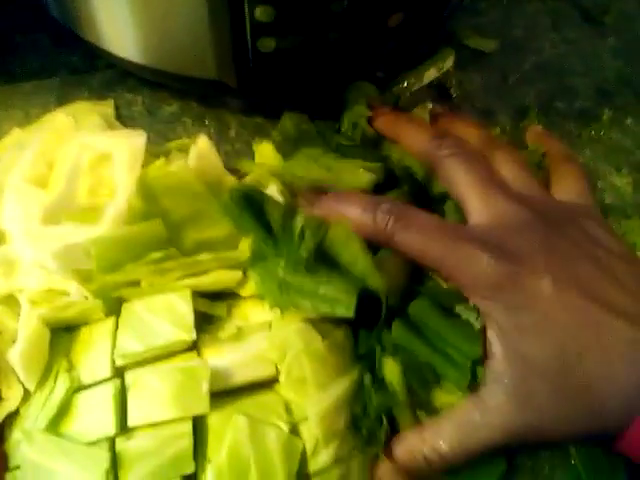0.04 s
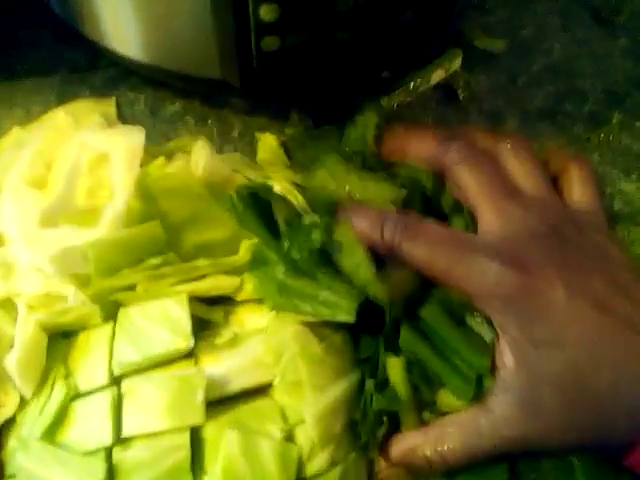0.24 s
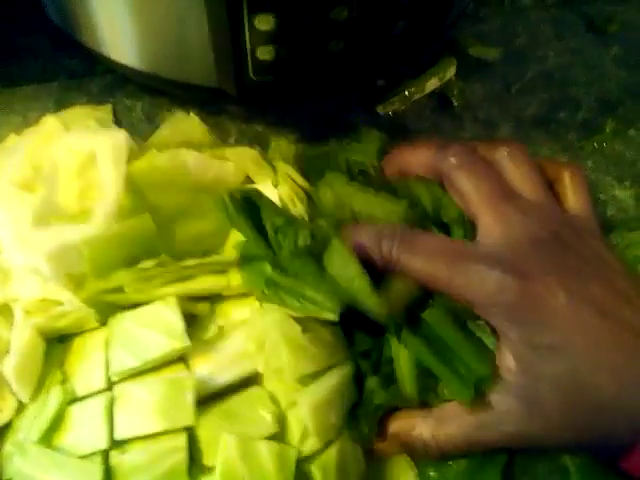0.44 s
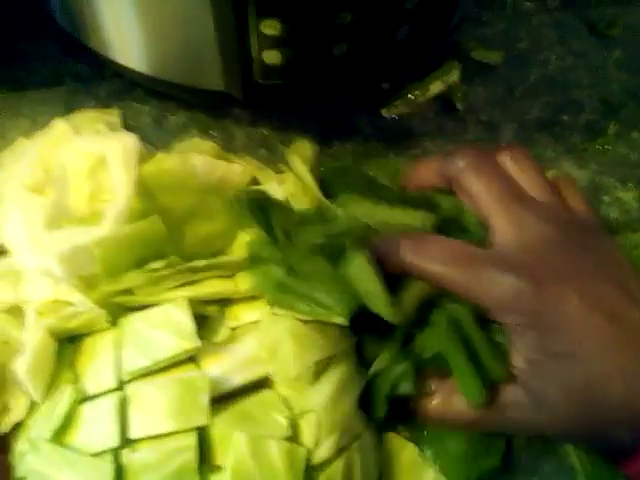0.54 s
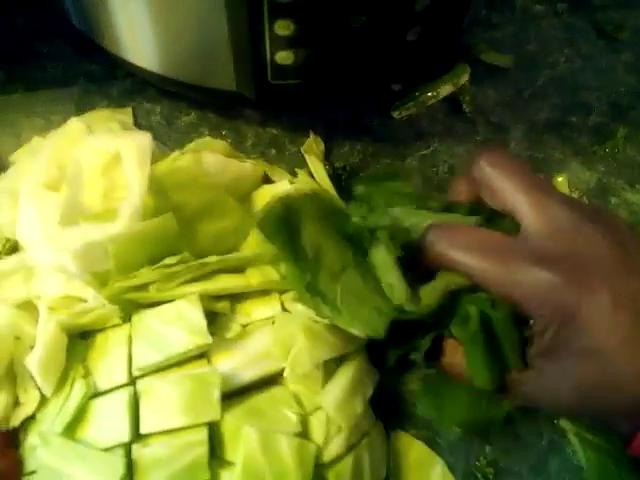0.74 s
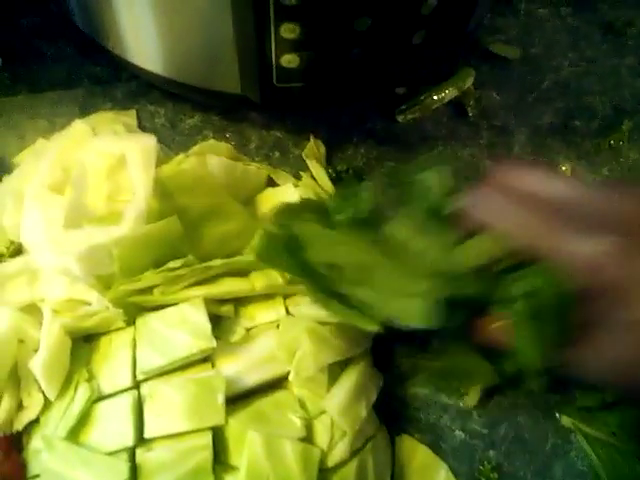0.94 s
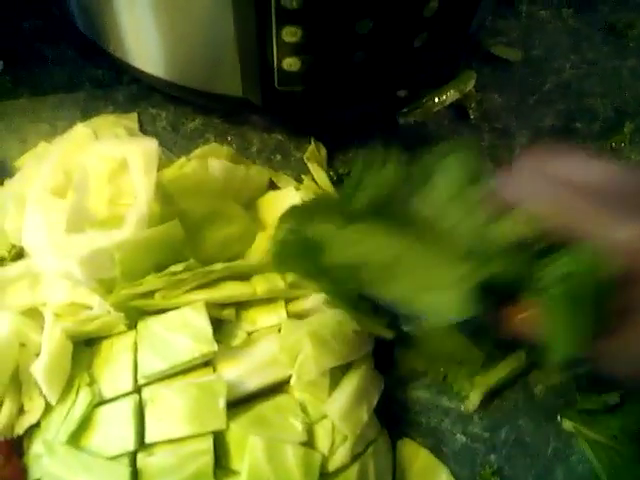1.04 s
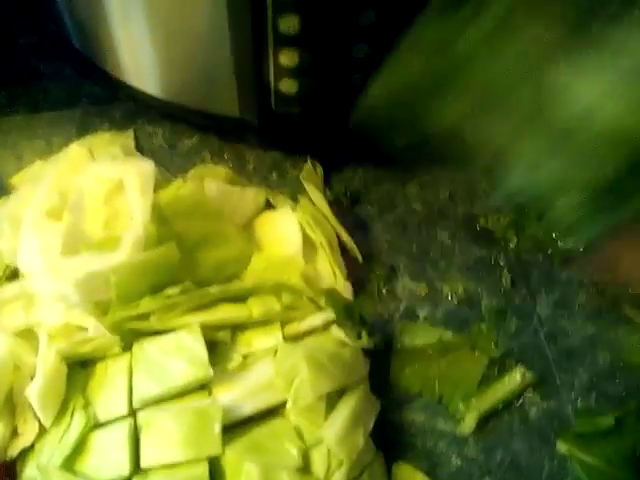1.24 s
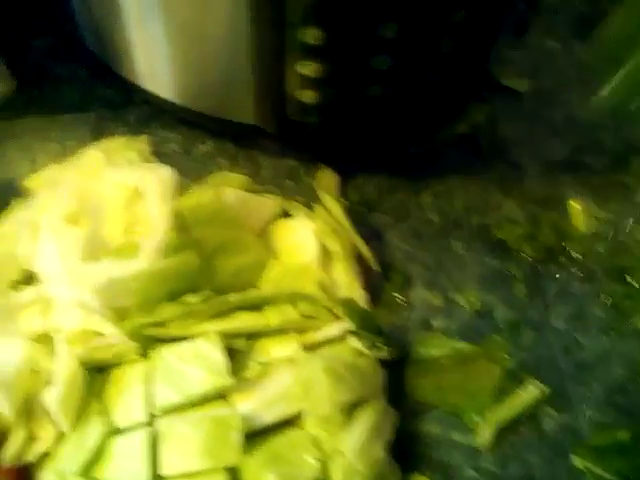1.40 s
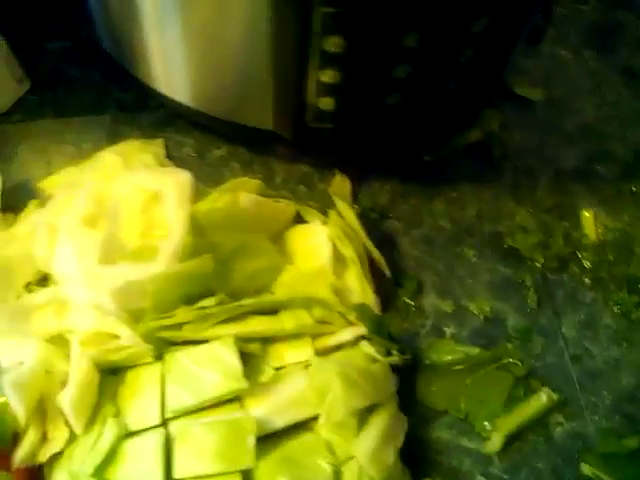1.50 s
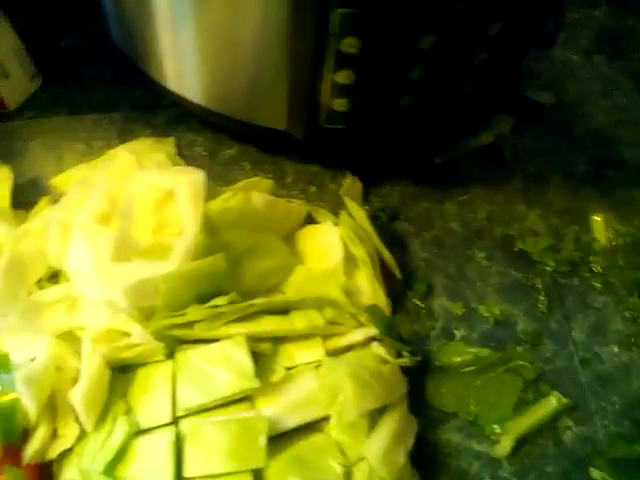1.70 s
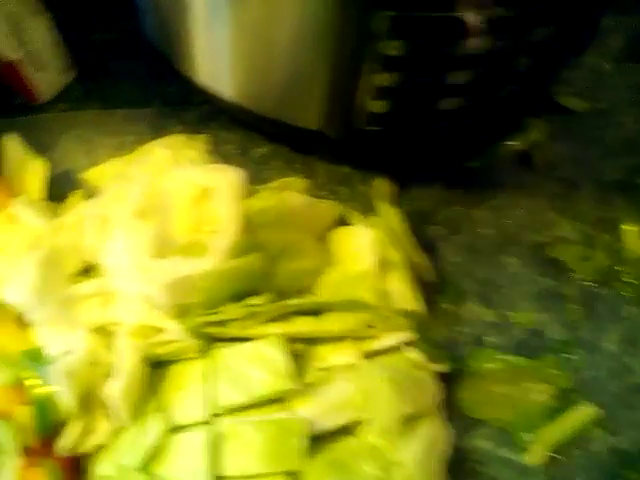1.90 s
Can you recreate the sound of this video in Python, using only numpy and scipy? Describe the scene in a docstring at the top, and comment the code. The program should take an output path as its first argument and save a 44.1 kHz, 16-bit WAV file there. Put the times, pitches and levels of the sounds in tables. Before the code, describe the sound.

Chopped leafy greens crinkle and snap in a closing hand, scrape with small squeaks along a stone counter, then lift away; a quiet appliance hum remains, close to a cheap, gritty camera microphone in a kitchen.

```python
"""Close to a small camera in a kitchen: an appliance hums throughout, over dull room air.
A hand closes on chopped leafy greens on a stone counter: dense creases crinkle and bursts of cracks snap.
Fingertips thump softly, and stick-slip pulses ring a squeak and a low body as the bunch is dragged along.
The bunch is lifted away, a few last snaps fall, and the hum is left.
The camera's coarse amplitude steps, then its low sample rate, turn the quiet hum gritty."""
import sys
import numpy as np
from scipy import signal
from scipy.fft import rfft, irfft, next_fast_len
from scipy.io import wavfile
from scipy.ndimage import uniform_filter1d

SR = 44100
rng = np.random.default_rng(int(sys.argv[2]) if len(sys.argv) > 2 else 0)


def waveform_to_disk(signal):
    """Save audio, clipped to [-1, 1], as 16-bit WAV at the path in sys.argv[1]."""
    frames = np.transpose(np.atleast_2d(signal))
    scaled = np.clip(frames, -1, 1) * 32767
    samples = np.round(scaled).astype(np.int16)
    wavfile.write(sys.argv[1], SR, samples)


def invert_db(x):
    """Field ratio 10**(x/20) for x, a level in decibels (scalar or array-like)."""
    u = np.asarray(x, float) / 20
    return 10 ** u


N = 85995

# How hard the leaves rub in the closing hand: (time [s], level [dB])
SQUEEZE_EFFORT = [(0.0, -55.5), (0.168, -62.5), (0.196, -47.5), (0.258, -52.5), (0.318, -43.5),
                  (0.354, -58.5), (0.406, -39), (0.428, -52), (0.476, -52.5), (0.488, -36), (0.52, -50.5),
                  (0.552, -37), (0.56, -46), (0.588, -48), (0.642, -46.5), (0.662, -35.5), (0.714, -55),
                  (0.73, -32.5), (0.762, -42.5), (0.872, -39.5), (0.908, -43.5), (0.92, -37.5),
                  (0.932, -35.5), (0.948, -39), (0.956, -34.5), (0.984, -39), (1.032, -39), (1.05, -34.5),
                  (1.062, -36.5), (1.078, -36), (1.09, -39.5), (1.13, -34.5), (1.182, -46.5), (1.19, -36),
                  (1.222, -53.5), (1.272, -58), (1.288, -52), (1.328, -83.5), (1.356, -62), (1.45, -72.5)]


def unit(x):
    """Scales a signal to rms 1."""
    return x / np.sqrt(np.mean(x ** 2) + 1e-20)


def along(points, hz):
    """Reads (frequency, value) points on a logarithmic frequency axis."""
    f, v = np.transpose(points)
    return np.interp(np.log(hz + 1), np.log(f + 1), v)


def level(rows):
    """Gain per sample from (time [s], level [dB]) rows, at -120 dB outside them."""
    s, db = np.transpose(rows)
    return invert_db(np.interp(np.arange(N) / SR, s, db, left=-120, right=-120))


def filtered(x, response):
    """Multiplies the spectrum of x by a response of frequency."""
    m = next_fast_len(N + SR // 2)
    return irfft(rfft(x, m) * response(np.fft.rfftfreq(m, 1 / SR)), m)[:N]


def resonant(x, peaks):
    """Passes x through parallel resonances (frequency [Hz], width [Hz], level [dB]) of alternating sign."""
    def response(f):
        total = 0
        for k, (center, width, db) in enumerate(peaks):
            damping = 1j * f * width
            total = total + (-1) ** k * invert_db(db) * damping / (center * center - f * f + damping)
        return total
    return filtered(x, response)


def grains(start_s, hz, cycles, gain, size=256):
    """Adds up short sines that rise in about half a cycle and decay over the given cycles."""
    t = np.arange(size) / SR
    turns = hz[:, None] * t
    envelope = np.exp(-turns / cycles) * (1 - np.exp(-turns / .5))
    wave = gain[:, None] * np.sin(2 * np.pi * turns) * envelope
    at = (start_s * SR).astype(int)[:, None] + np.arange(size)
    return np.bincount(at.ravel(), wave.ravel(), N + SR)[:N]


def crinkle():
    """Dense tiny creases over a rubbing hiss, in clumps that start sharply and die away."""
    # Colour of the rubbing hiss: (frequency [Hz], relative spectral level [dB])
    leaf_color = [(180, -23), (300, 1.5), (387, -22.5), (449, -6), (636, -15), (1000, -3), (1440, -12),
                  (4630, -6), (7400, -5.5), (9620, -43.5), (16300, -120)]
    creases_per_s, center_hz, spread_db = 3000, 3800, 3
    clumps_per_s, clump_decay_s = 170, .004

    u = rng.random((8000, 2))
    g = rng.standard_normal(len(u))
    start_s = np.cumsum(-np.log(1 - u[:, 0])) / creases_per_s
    keep = start_s < N / SR
    hz = np.clip(center_hz * np.exp(.55 * g), 400, 7500)[keep]
    gain = np.sqrt(hz) * invert_db(-spread_db * np.log(1 - .98 * u[keep, 1]))
    creases = grains(start_s[keep], hz, 2.2, gain, size=128)
    hiss = filtered(rng.standard_normal(N), lambda f: invert_db(along(leaf_color, f)))

    kicks = (rng.random(N) < clumps_per_s / SR) * rng.random(N)
    decay = np.exp(-1 / (clump_decay_s * SR))
    clumps = .5 + unit(signal.lfilter([1], [1, -decay], kicks))
    rubbing = unit(creases) + invert_db(-1.5) * unit(hiss)
    return level(SQUEEZE_EFFORT) * unit(rubbing * clumps ** .5)


def snaps():
    """Each snap of leaf or stalk is a click and dying cracks around one pitch, on a puff of that colour."""
    # Leaves and stalks snapping: (time [s], level before the part levels below [dB], pitch [Hz],
    # t60 of the cracks [s], pitch spread [log ratio])
    snap_events = [(0.183, -37.5, 5360, 0.03, 0.23), (0.199, -40, 4400, 0.03, 0.12),
                   (0.2857, -33.5, 5630, 0.03, 0.14), (0.3034, -41.5, 5340, 0.03, 0.2),
                   (0.3184, -39, 4500, 0.03, 0.2), (0.3681, -33, 3880, 0.03, 0.3),
                   (0.394, -41, 2430, 0.03, 0.17), (0.4044, -37.5, 3210, 0.03, 0.23),
                   (0.4851, -28, 3010, 0.03, 0.17), (0.5074, -28, 5600, 0.03, 0.12),
                   (0.5271, -34, 1566, 0.03, 0.18), (0.5463, -12, 6730, 0.03, 0.095),
                   (0.552, -32.5, 6800, 0.03, 0.11), (0.5764, -37, 2890, 0.03, 0.31),
                   (0.6008, -31.5, 2340, 0.03, 0.31), (0.6509, -35, 5300, 0.03, 0.16),
                   (0.6616, -29, 5700, 0.03, 0.068), (0.7214, -26, 6500, 0.03, 0.075),
                   (0.7286, -18, 6230, 0.03, 0.078), (0.8139, -28.5, 6060, 0.03, 0.14),
                   (0.8334, -26.5, 4820, 0.03, 0.31), (0.863, -30, 1774, 0.03, 0.2),
                   (0.8824, -32.5, 2780, 0.03, 0.23), (0.9177, -34.5, 3090, 0.03, 0.29),
                   (0.9428, -18.5, 4540, 0.03, 0.26), (0.9714, -24.5, 3340, 0.03, 0.23),
                   (0.983, -18, 6140, 0.03, 0.23), (0.9909, -31, 6200, 0.03, 0.13),
                   (1.0031, -27, 2144, 0.03, 0.18), (1.0224, -32.5, 2120, 0.03, 0.31),
                   (1.043, -24, 4450, 0.03, 0.26), (1.0504, -28, 3240, 0.03, 0.15),
                   (1.0542, -26, 4400, 0.03, 0.24), (1.0733, -22.5, 5750, 0.03, 0.14),
                   (1.0795, -28.5, 5120, 0.03, 0.2), (1.122, -37, 2150, 0.03, 0.29),
                   (1.1455, -29, 2240, 0.03, 0.23), (1.165, -22, 5000, 0.03, 0.23),
                   (1.1901, -27, 3170, 0.03, 0.25), (1.2869, -34.5, 5500, 0.03, 0.3),
                   (1.3538, -41, 6200, 0.03, 0.14), (1.3684, -41.5, 3850, 0.03, 0.12),
                   (1.5369, -48, 4300, 0.03, 0.16), (1.5489, -43.5, 3280, 0.03, 0.2)]
    crack_db, puff_db, click_db = -8, -10, -6
    n_cracks, puff_rise_s, puff_lingers = 12, 0.00055, 1.4  # puff t60 over crack t60

    out, t = np.zeros(N + SR), np.arange(SR // 8) / SR
    f = np.fft.rfftfreq(len(t), 1 / SR) + 1
    for s, db, hz, t60, spread in snap_events:
        spread = np.clip(spread, .05, .8)
        u, g = rng.random(n_cracks), rng.standard_normal((2, n_cracks))
        # the first two cracks fall together, the rest crowd toward the start
        late_s = t60 / 3 * u ** 1.5 * (np.arange(n_cracks) > 1)
        crack_hz = np.clip(hz * np.exp(spread * g[0]), 700, 7600)
        crack_gain = invert_db(db + crack_db + 2.1 * g[1] - 60 * late_s / t60)
        out[:N] += grains(s + late_s, crack_hz, 4, crack_gain)

        color = 1 / (1 + (np.log(f / hz) / (2.4 * spread)) ** 4)
        puff = unit(irfft(rfft(rng.standard_normal(len(t))) * color, len(t)))
        fade = invert_db(db + puff_db - 60 * t / (t60 * puff_lingers))
        out[round(s * SR):][:len(t)] += fade * (1 - np.exp(-t / puff_rise_s)) * puff

        click_gain = np.array([invert_db(db + click_db)])
        out[:N] += grains(np.array([s]), np.array([3500.]), 0.28, click_gain, size=64)
    return out[:N]


def drag():
    """Stick-slip pulses of damp leaves on stone ring a gliding squeak, a low body and the bunch's hollow."""
    # Bunch sliding on the counter: (time [s], level before the part levels below [dB],
    # squeak pitch [Hz], body level before a 2 dB cut [dB])
    slide = [(0.45, -75, 980, -2), (0.466, -85, 1074, 19), (0.492, -63.5, 1054, 2.5),
             (0.586, -56.5, 954, 2.5), (0.648, -44, 1060, -3.5), (0.69, -46, 1054, 2),
             (0.704, -57, 1055, 11), (0.726, -44, 1060, -7.5), (0.764, -67, 1085, 7),
             (0.782, -43, 1073, -15), (0.806, -57, 1030, -9.5), (0.882, -46.5, 1035, -4),
             (0.898, -55, 1014, -1.5), (0.956, -42, 987, -10), (1.066, -49.5, 1066, -4.5),
             (1.074, -42, 1040, -21), (1.094, -62, 987, -14.5), (1.152, -41, 920, -12),
             (1.166, -60.5, 990, -25), (1.194, -48.5, 1070, -5), (1.22, -69, 1030, -29),
             (1.29, -86, 1030, 16), (1.3, -75, 1030, -7)]
    # Low resonances of the body: (frequency [Hz], width [Hz], level [dB])
    body_peaks = [(430, 90, 0.97), (544, 76, -1.1), (783, 48, -0.44)]
    # Higher resonances of the bunch: (frequency [Hz], width [Hz], level [dB])
    hollow_peaks = [(1517, 260, -3), (2200, 77, -1.5), (3204, 200, -4), (4820, 260, 1)]
    slips_per_s, slip_spread_db, ring_width_hz = 1800, 2.2, 110

    u = rng.random((2, N))
    slips = (u[0] < slips_per_s / SR) * invert_db(-slip_spread_db * np.log(1 - u[1]))
    slips = slips - slips.mean()
    s, db, hz, body_db = np.transpose(slide)
    t = np.arange(N) / SR

    # a one-pole resonator whose pitch turns with the glide
    turn = np.exp(2j * np.pi * np.cumsum(np.interp(t, s, hz)) / SR)
    decay = np.exp(-np.pi * ring_width_hz / SR)
    squeak = (turn * signal.lfilter([1], [1, -decay], slips / turn)).real
    squeak = resonant(squeak, [(1030, 610, 0)])

    body = resonant(resonant(slips, body_peaks), [(640, 240, 0)])
    body = invert_db(np.interp(t, s, body_db) - 2.0) * unit(body)
    hollow = invert_db(-6) * unit(resonant(slips, hollow_peaks))
    return level(np.c_[s, db]) * (invert_db(0.5) * unit(squeak) + body + hollow)


def presses():
    """Fingertips thump the counter: soft low sines that rise smoothly and die away."""
    # Thumps: (time [s], level before rise and decay [dB], pitch [Hz])
    thumps = [(0.371, -37, 293.5), (0.39, -41.5, 310), (0.539, -37.5, 208), (0.74, -40, 295.5),
              (0.918, -56, 285)]
    t60_s, rise_s = .12, .012
    out, t = np.zeros(N + SR), np.arange(SR // 4) / SR
    for s, db, hz in thumps:
        envelope = invert_db(db - 60 * t / t60_s) * (1 - np.exp(-t / rise_s))
        out[round(s * SR):][:len(t)] += envelope * np.sin(2 * np.pi * hz * t)
    return out[:N]


def rumble():
    """Dull noise of the counter shaken by the hand, slowly following its effort."""
    # Colour of the shaken counter: (frequency [Hz], relative spectral level [dB])
    counter_color = [(40, -25.5), (100, 0.1), (200, 0.5), (330, -12), (600, -25)]
    follow_s = 0.36
    effort = np.abs(uniform_filter1d(level(SQUEEZE_EFFORT), int(follow_s * SR))) ** .45
    shaking = filtered(rng.standard_normal(N), lambda f: invert_db(along(counter_color, f)))
    return invert_db(-58) * effort / effort.max() * unit(shaking)


def kitchen(x):
    """Reverberant tail of the room: noise in which each frequency dies at its own speed."""
    # Decay of the kitchen: (frequency [Hz], t60 [s])
    room_decay = [(200, 0.28), (2000, 0.27), (8000, .18)]
    hz, t, z = signal.stft(rng.standard_normal(SR // 2), SR, nperseg=256)
    fading = z * invert_db(-60 * t / along(room_decay, hz)[:, None])
    tail = signal.istft(fading, SR, nperseg=256)[1]
    delayed = np.pad(x, (200, 0))  # samples
    return signal.fftconvolve(delayed, tail / np.linalg.norm(tail))[:N]


def background():
    """Appliance hum, wavering as noise through narrow resonances, over dull noise of room air."""
    # Hum resonances, each narrowed by a second pass: (frequency [Hz], width of first pass [Hz], level [dB])
    hum_peaks = [(116.2, 14, -15.5), (204.3, 13, -8.5), (246.65, 9, -1), (293, 8, -5), (314.7, 7.8, -3.5),
                 (352.2, 6, 3), (544, 12, -8), (836.5, 22, -12.5), (928.5, 7.7, -10.5)]
    # Colour of the room air: (frequency [Hz], relative spectral level [dB])
    air_color = [(20, -17), (60, -11.5), (150, -7.5), (350, -0.3), (700, -5.5), (1500, -8.5), (3500, -19),
                 (6000, -19.5), (16000, -27)]
    hum_db, air_db = -58.5, -57.5
    noise = rng.standard_normal((2, N))
    wider = [(center, 3 * width, 0) for center, width, db in hum_peaks]
    hum = resonant(resonant(noise[0], hum_peaks), wider)
    air = filtered(noise[1], lambda f: invert_db(along(air_color, f)))
    return invert_db(hum_db) * unit(hum) + invert_db(air_db) * unit(air)


def scene():
    """Leaves close to the camera with the kitchen's tail, the shaken counter and the background."""
    leaves = crinkle() + snaps() + drag() + presses()
    wet = invert_db(-11.5) * kitchen(leaves)
    return (leaves + wet + rumble() + background())[None]


def roll_off(x):
    """The treble ends steeply here."""
    return signal.sosfilt(signal.butter(12, 8330, fs=SR, output="sos"), x)


def record(dry):
    """The camera rounds to coarse steps, then lowers the sample rate to 16 kHz; a filter dulls the top."""
    # Playback filter: (frequency [Hz], gain [dB])
    playback_gain = [(6000, -1.57), (6900, -5.5), (7400, -11), (7900, -23.5), (8250, -31), (8600, -80.5)]
    step, offset = .0034, -.00074  # full scale = 1
    stepped = step * (np.floor(dry[0] / step) + .5)
    low_rate = signal.resample_poly(stepped, 160, 441)  # 44.1 kHz to 16 kHz
    back = signal.resample_poly(low_rate, 441, 160)[:N]
    back = filtered(back, lambda f: invert_db(along(playback_gain, f)))
    dither = invert_db(-99) * rng.standard_normal(N)
    mix = (back + offset + dither)[None]
    return roll_off(mix)


dry = scene()
out = record(dry)
waveform_to_disk(out)
```